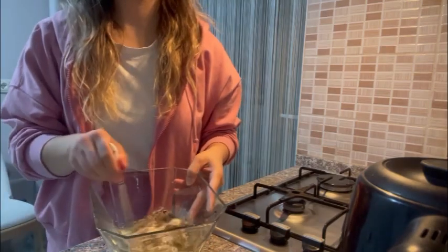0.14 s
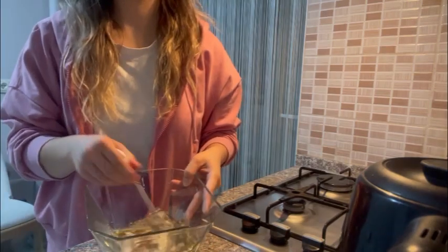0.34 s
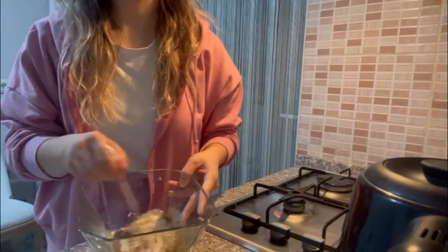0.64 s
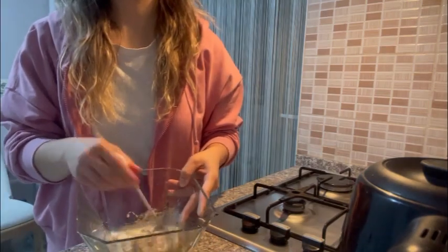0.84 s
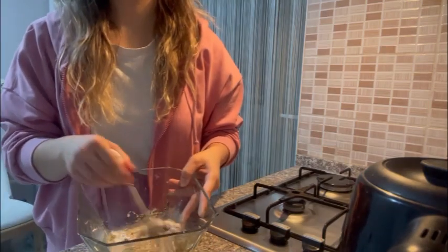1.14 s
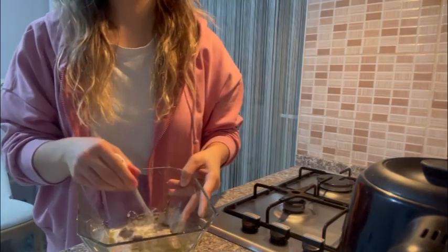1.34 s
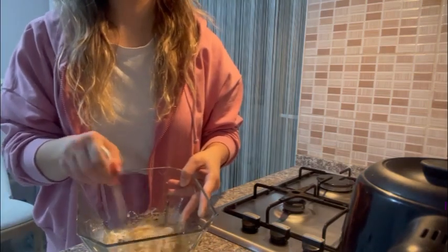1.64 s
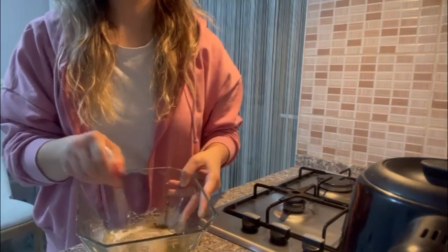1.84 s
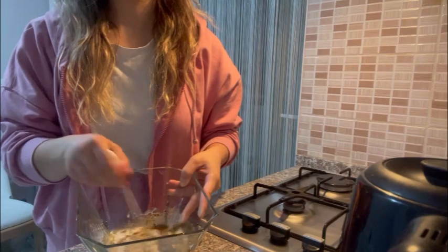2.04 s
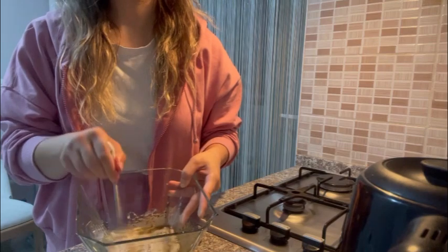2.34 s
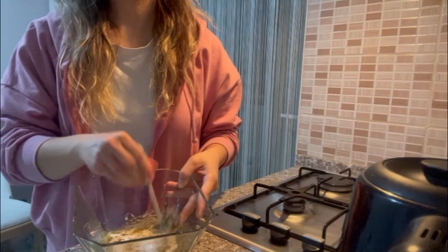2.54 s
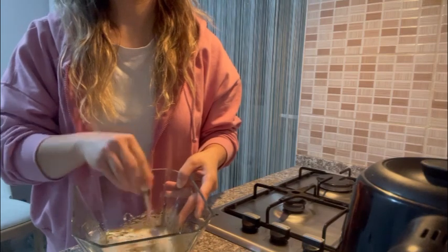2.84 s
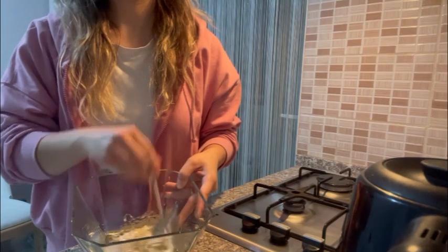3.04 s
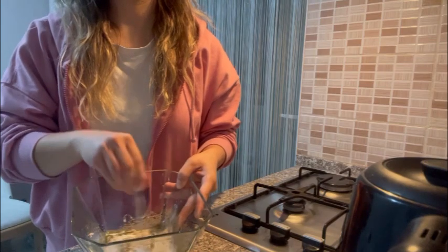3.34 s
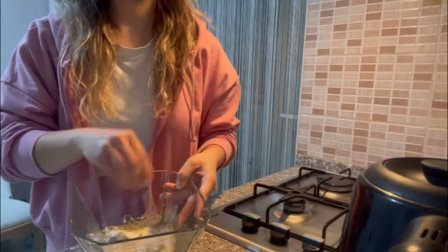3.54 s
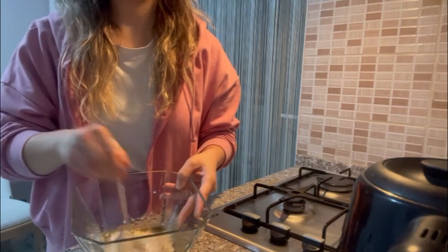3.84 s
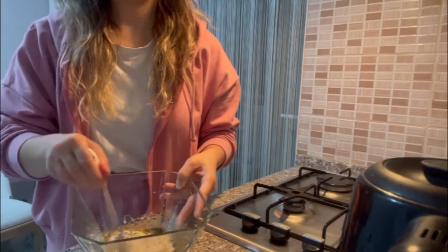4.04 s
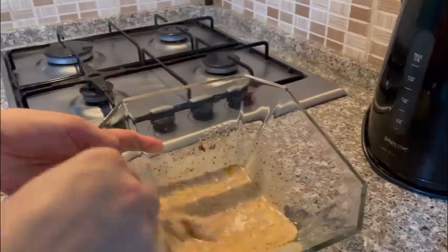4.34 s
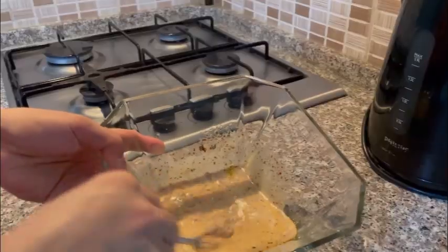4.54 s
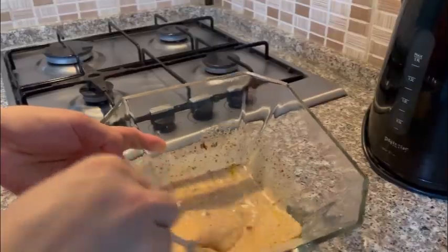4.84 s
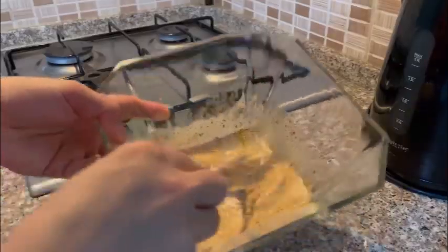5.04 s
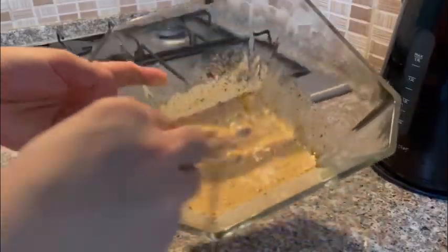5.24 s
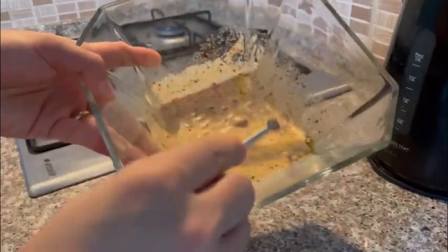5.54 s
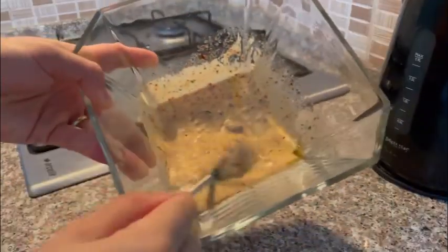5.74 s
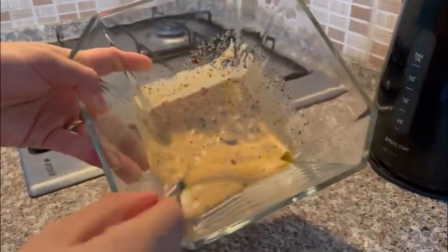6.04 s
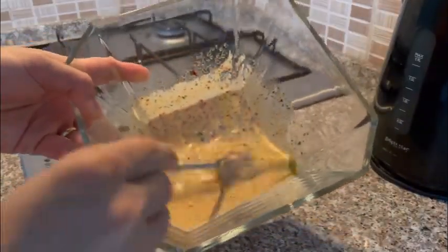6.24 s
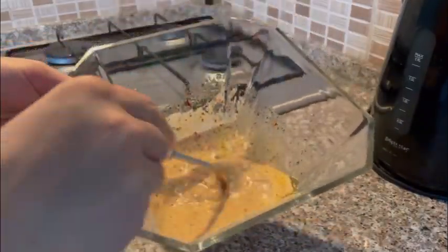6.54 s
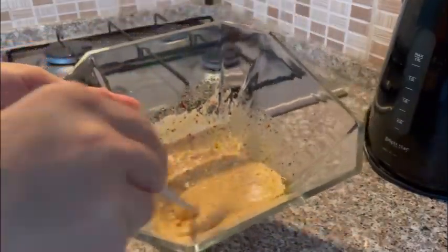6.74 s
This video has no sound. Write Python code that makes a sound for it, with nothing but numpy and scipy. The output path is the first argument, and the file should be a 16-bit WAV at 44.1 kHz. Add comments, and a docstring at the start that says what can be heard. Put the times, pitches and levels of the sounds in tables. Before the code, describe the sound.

A close stereo microphone in a small tiled kitchen hears a metal fork beating egg batter in a thick glass bowl on stone. A hard, hollow knock lands at 0.0 s, with the loudest at 0.85 and more strong ones at 1.0, 1.35 and 1.55, each rattling the fork. Between them come bright uneven clinks, scratchy scraping, wet crackle and small batter smacks around 0.4, 0.6 and 1.3. From 1.9 to 4.2 the knocks are mostly soft thumps, clinks stand out near 2.8 to 3.1, swishes gather around 3.5, and the pressed bowl groans briefly near 4.0 to 4.2. At 4.2 the ringing cuts off and the faint hum and air drop slightly. Stirring continues gentler and duller, with a thump at 4.5, clinks at 4.7 and 6.2, a quieter gap before 6.2, then soft wet scraping to about 7.

```python
"""Beating egg batter in a glass bowl

A metal fork beats batter in a square glass bowl on a stone counter in a small tiled kitchen. Knocks and clinks
are struck banks of modes with a noisy burst; groans are bowed tones. Scratching, skids and drone are random
slips through resonances; crackle, swishes, smacks, rumble and air are shaped noise. An appliance hums low, as
wavering sines. At 4.2 s the ringing is cut off and the background drops a little; afterwards the knocks are
thinner and brighter, the fork sounds duller and the stirring goes on more gently."""
import sys
import numpy as np
from scipy import signal
from scipy.io import wavfile
from scipy.ndimage import uniform_filter1d

SR = 44100
rng = np.random.default_rng(int(sys.argv[2]) if len(sys.argv) > 2 else 0)


def waveform_to_disk(signal):
    """Save audio, clipped to [-1, 1], as 16-bit WAV at the path in sys.argv[1]."""
    frames = np.transpose(np.atleast_2d(signal))
    scaled = np.clip(frames, -1, 1) * 32767
    samples = np.round(scaled).astype(np.int16)
    wavfile.write(sys.argv[1], SR, samples)


N = 303408
TIME = np.arange(N) / SR
BANDS = 1000 * 2 ** (np.arange(-15, 13) / 3)   # third-octave centres, Hz
BREAK_S = 4.226

# bowl against counter: (time [s], level [dB], strongest pitch [Hz], glassy edge [dB])
BOWL_KNOCKS = [(0.001, -11, 730, 0), (0.186, -32.5, 460, -12), (0.852, -5.5, 726, 2.5),
               (1.007, -18, 573, -0.5), (1.363, -10.5, 706, 2.5), (1.566, -8.5, 585, -2),
               (1.922, -32.5, 653, 14.5), (2.153, -37.5, 750, 10.5), (2.534, -35, 513, 2),
               (2.585, -33, 615, 11), (2.832, -22.5, 602, -16), (3.092, -26, 632, -1),
               (3.344, -36.5, 600, -17), (3.527, -45.5, 657, 4), (4.011, -31, 680, 9.5),
               (4.195, -36, 665, 8), (4.385, -54, 884, 11), (4.52, -26.5, 554.5, -7),
               (6.222, -54.5, 820, 8)]
# fork against glass: (time [s], level [dB], strongest pitch [Hz])
FORK_CLINKS = [(0.166, -35.5, 3960), (0.221, -38.5, 3960), (0.5104, -40, 4140), (0.555, -40, 4220),
               (0.618, -51, 12400), (0.7777, -55, 4200), (0.948, -38, 4200), (1.0192, -40.5, 4440),
               (1.151, -51.5, 4000), (1.275, -34.5, 3930), (1.5014, -43, 8300), (1.5566, -42.5, 12200),
               (1.737, -55, 8300), (1.872, -52, 4230), (1.9202, -34.5, 4735), (2.113, -40, 3950),
               (2.155, -47, 4650), (2.2702, -53.5, 12800), (2.503, -47, 3740), (2.5853, -35.5, 5800),
               (2.631, -48.5, 13800), (2.7538, -49, 7140), (2.774, -39.5, 3700), (2.833, -30, 2750),
               (2.9987, -29.5, 10880), (3.092, -31.5, 7400), (3.2677, -40, 4300), (3.3424, -39.5, 3960),
               (3.533, -49, 3930), (4.001, -45.5, 12000), (4.0092, -36, 4620), (4.191, -34, 10700),
               (4.253, -53, 6960), (4.384, -48, 4360), (4.47, -45, 4230), (4.7208, -33.5, 4000),
               (4.809, -58, 9730), (5.0054, -47.5, 4280), (5.741, -60, 9400), (6.2227, -35, 4190),
               (6.294, -39.5, 4175), (6.436, -59.5, 5500), (6.514, -58, 5970), (6.821, -60, 5880)]
# batter smacking off the fork: (time [s], level [dB], pitch [Hz])
BATTER_SMACKS = [(0.294, -53.5, 3600), (0.3701, -40.5, 2300), (0.6158, -44, 2700), (1.265, -41.5, 1740),
                 (1.951, -46, 2400), (4.013, -45, 2150), (4.1815, -47.5, 1730)]
# tines skidding on the glass: (middle time [s], level [dB], pitch [Hz])
TINE_SKIDS = [(1.198, -59.5, 5060), (1.85, -62.5, 4790), (2.091, -66.5, 4760), (3.463, -64, 4100),
              (4.452, -59, 4230), (4.993, -59.5, 3910), (6.31, -64.5, 4170), (6.6, -69, 4190)]
# fork sweeping batter along the wall: (middle time [s], level [dB], pitch [Hz])
WALL_SWISHES = [(0.439, -69, 2300), (0.76, -76, 4800), (1.11, -76, 5000), (1.85, -73, 5200),
                (2.08, -69.5, 4670), (2.32, -73.5, 4800), (2.43, -85, 4500), (2.715, -70, 3800),
                (2.96, -66, 3800), (3.221, -66, 5020), (3.473, -62, 3570), (3.555, -65, 3380),
                (3.69, -65, 3380), (3.771, -75.5, 4200), (5, -74, 4430), (5.12, -71, 4300),
                (6.31, -75, 5200), (6.57, -68.5, 5660), (6.689, -71.5, 2490), (6.86, -71, 4410)]
# bowl groaning under the pressed fork: (middle time [s], half length [s], level [dB], pitch [Hz])
BOWL_GROANS = [(1.307, 0.019, -48, 717), (2.185, .018, -44.5, 724), (4.035, .012, -32, 694),
               (4.074, .05, -47.5, 740), (4.161, 0.0342, -52, 742), (4.212, 0.012, -36, 679.3)]
# effort of the stirring, which sets the level of its scratching: (time [s], level [dB])
STIR_EFFORT = [(0.0, -71), (0.67, -73.5), (0.94, -75), (2.11, -81), (2.34, -79.5), (2.95, -73), (3.39, -79),
               (3.85, -86), (4.04, -100), (4.25, -72), (4.65, -79), (4.97, -73.5), (5.25, -79.5),
               (6.19, -100), (6.46, -75.5), (6.88, -78)]

# a hard knock as a faint lead-in, the main blow and two weaker repeats: (delay [s], level [dB])
HARD_KNOCK_PARTS = [(-0.007, -24), (0, -1.5), (0.008, -7.5), (0.022, -11.5)]
HARD_KNOCK_ABOVE_DB = -15
# a hard knock is bright and shakes the counter, a soft one is a dull, hollow thump:
# (knock level [dB], bass [dB], treble [dB])
KNOCK_COLOUR_BY_LEVEL = [(-47, 5, -11.5), (-20, -4, -17.5), (-17, -5.5, 6), (-5.5, 2, 8.5)]
# colour of the fork jolted by a knock: (frequency [Hz], level [dB])
FORK_JOLT_COLOUR = [(1500, -5), (1900, -1), (2800, -3), (4100, -20.5), (4560, -10.5), (6000, -16.5),
                    (11000, -33)]

# resonances of the bowl on the counter: (frequency [Hz], relative level [dB], t60 [s])
BOWL_RESONANCES = [(124, -3, 0.39), (180.6, -4.5, 0.43), (228.2, -7.5, 0.25), (263, 4, 0.11),
                   (314.6, -7.5, 0.33), (445, -6.5, 0.41), (495, 1.5, 0.095), (546, -5, 0.15),
                   (633, 4, 0.15), (664.4, 2.5, 0.25), (696.3, 3.5, 0.14), (736, -3, 0.2),
                   (804.4, -3.5, 0.28), (867, -13.5, 0.19), (915, -17.5, .25), (1203, -7.5, 0.27),
                   (1244, 2.5, 0.07), (1398.4, -24.5, 0.11), (1504, -9.5, 0.22), (1736, -21.5, 0.1),
                   (1872, -23, 0.14), (2353, -27, 0.16), (2670, -36.5, 0.27), (3040, -29.5, 0.2)]
# fork and glass wall ringing together: (frequency [Hz], relative level [dB], t60 [s])
FORK_RESONANCES = [(1530, 2.5, 0.46), (1888, 1.5, 0.23), (2414, -2, 0.1), (2690, -3.5, 0.0827),
                   (3830, 0.5, 0.12), (4177, 8, 0.13), (4550, 1.5, 0.19), (5930, -7, 0.2),
                   (7130, -2.5, 0.071), (7560, -5.5, 0.075), (7840, -4, 0.14), (8100, -0.5, 0.12),
                   (9730, -9.5, 0.12), (10240, -5, 0.1), (11230, -3, 0.14), (11900, -7, 0.065),
                   (12430, -14.5, 0.14), (13800, -10, 0.12)]
# dense, unresolved resonances of a knock: (frequency [Hz], density [dB per Hz])
KNOCK_THUD = [(30, -52), (50, -20.5), (75, -4.5), (120, -3), (280, -2.5), (380, -4), (620, 5), (800, -5.5),
              (1000, -13), (1350, -17), (1900, -28), (2500, -38), (3100, -45.5), (3900, -61.5), (6000, -66),
              (10000, -81.5)]
# dense, unresolved resonances of a clink: (frequency [Hz], density [dB per Hz])
CLINK_TICK = [(600, -24), (1200, 1.5), (2600, 2.5), (4200, -4), (5200, -6), (7500, 0), (10000, -5),
              (13000, -8), (16000, -22.5)]
# crackling and swishing batter: (frequency [Hz], density [dB per Hz])
WET_SPECTRUM = [(1000, -5.5), (2500, -1.5), (4500, 2.5), (6500, -8), (9000, -1), (12000, -11), (16000, -20)]
# rumble of the bowl: (frequency [Hz], density [dB per Hz])
RUMBLE_SPECTRUM = [(60, -26.5), (120, -8), (300, 4), (420, -5), (660, 4), (900, -9), (1200, -37),
                   (3000, -49.5), (7000, -79)]

# decay of the kitchen: (frequency [Hz], t60 [s])
KITCHEN_T60 = [(100, 1.16), (260, 0.78), (700, .5), (1800, 0.4627), (5000, 0.27), (14000, 0.23)]
# left-right likeness, from -1 opposite to 1 the same: (frequency [Hz], likeness [-])
STEREO_LIKENESS = [(60, 0.99), (110, .93), (200, 0.89), (380, 0.3), (700, -0.45), (1300, 0.088),
                   (2400, 0.27), (4400, 0.21), (8000, -0.74), (13000, 1)]
# still air of the kitchen: (frequency [Hz], density [dB per Hz])
AIR_SPECTRUM = [(15, -55), (25, -22.5), (102, -1), (134, -24.5), (166, -7.5), (217, -23.5), (301, -18),
                (451, -27.5), (624, -27), (1100, -39.5), (2280, -49), (2610, -56), (3200, -50),
                (4490, -52.5), (5880, -57.5), (16000, -77)]
# appliance hum: (frequency [Hz], relative level [dB])
APPLIANCE_HUM = [(97.5, -70), (296, -72.5)]
# faint high tones of the appliance: (frequency [Hz], relative level [dB])
APPLIANCE_WHINE = [(3085, -83.5), (3590, -87), (4545, -87)]

# after the break the knocks are thinner and brighter; pan is left minus right
LATE_BASS_DB, LATE_TREBLE_DB, LATE_PAN_DB = -5, 19, -0.5
# before the break the hollow low note of the bowl leans to the right (left minus right)
HOLLOW_PAN_DB = -3.5
# bowl and fork shudder on after each knock: level against the knock, and decay
SHUDDER_DB, SHUDDER_T60_S = -36, 0.86
# low ring of the clean wall, the batter's damping of it, and the top of each clink
CLEAN_RING_DB, COATING_DB_PER_S, CLINK_TOP_DB = 2, 3, 4.5
# after the break the batter chokes a clink's ring; its low note no longer sinks with time
LATE_CHOKE_DB_PER_S, LATE_RING_DB = 83.5, -10
# a knock jolts the fork: level, and growth in dB per dB of the knock
JOLT_DB, JOLT_GROWTH = -28.5, 1.205
# light touches between the clinks: rate at mean effort, and level above the effort
TOUCHES_PER_S, TOUCH_DB = 3.5, 3
# the batter fizzes as it runs back after each listed clink: level against the clink, and decay
FIZZ_DB, FIZZ_T60_S = -30.5, 0.25
# a skid at SKID_DB has length SKID_S; the length halves with every SKID_HALVING_DB more
SKID_S, SKID_DB, SKID_HALVING_DB = 0.022, -55.5, 6.5
# what the effort drives, in dB above it; after the break the bowl rumbles less
SCRAPE_DB, CRACKLE_DB, RUMBLE_DB, LATE_RUMBLE_DB = -1.5, -1.5, 14, -10
# low ring under the dragged fork, its damping by the coating, and the spurts of the scratching
SCRAPE_RING_DB, SCRAPE_COATING_DB_PER_S, SPURT_DB = 8.5, 0.1, 3
# after the break the fork sounds duller: a low-pass, a notch and a lift
DULL_LOWPASS_HZ, DULL_NOTCH_HZ, DULL_NOTCH_WIDTH_HZ = 10650, 8270, 1100
DULL_LIFT_HZ, DULL_LIFT_WIDTH_HZ, DULL_LIFT_DB = 6700, 820, 6   # level of the added resonance


def amp(db):
    """Decibels to amplitude."""
    return 10 ** (np.asarray(db) / 20)


def left_right(db):
    """Gains of the two sides for a level difference, left minus right."""
    return amp(db * np.array([[.5], [-.5]]))


def rms_one(x):
    """Scale to rms 1."""
    return x / np.sqrt(np.mean(x ** 2) + 1e-20)


def at_hz(points, hz):
    """Read a table on a log-frequency axis."""
    f, value = np.transpose(points)
    return np.interp(np.log(hz), np.log(f), value)


def band_gains(spectrum):
    """Third-octave gains of a spectrum, with total power 1."""
    gains = amp(at_hz(spectrum, BANDS)) * np.sqrt(BANDS)   # bandwidth grows with frequency
    return gains / np.linalg.norm(gains)


def drift(per_s):
    """Random wander between knots, spread near 1; it holds still if the 4000 knots run out."""
    knots = rng.standard_normal(4000)
    return np.interp(TIME * per_s, np.arange(len(knots)), knots)


def noise_bands():
    """Third-octave stereo noises (band, side, sample), each as alike left and right as the table says."""
    white = rng.standard_normal((2, 2, N), np.float32)
    bank = np.empty((len(BANDS), 2, N), np.float32)
    for k, hz in enumerate(BANDS):
        edges = [hz / 2 ** (1 / 6), hz * 2 ** (1 / 6)]
        sos = signal.butter(3, edges, "band", fs=SR, output="sos")
        mid, side = signal.sosfilt(sos, white[k % 2]).astype(np.float32)   # neighbours use separate noise
        alike = np.float32(np.clip(at_hz(STEREO_LIKENESS, hz), -1, 1))
        bank[k] = rms_one(np.sqrt(1 + alike) * mid + np.sqrt(1 - alike) * np.array([side, -side]))
    return bank


def coloured(bank, spectrum):
    """Steady stereo noise with a given spectrum and rms near 1."""
    noise = np.tensordot(band_gains(spectrum).astype(np.float32), bank, 1)
    return np.roll(noise, rng.integers(N), axis=1)


def resonate(x, hz, width_hz):
    """One two-pole resonance, gain 1 on top."""
    r = np.exp(-np.pi * width_hz / SR)
    zeros = np.array([1, 0, -1]) * (1 - r * r) / 2
    poles = [1, -2 * r * np.cos(2 * np.pi * hz / SR), r * r]
    return signal.lfilter(zeros, poles, x + 1e-18)


def grains(per_s, spread_db):
    """Random tiny slips of uneven size, reaching each side with its own strength."""
    slipping = rng.random(N) < per_s / SR
    sizes = amp(spread_db * np.minimum(rng.exponential(1, N), 4))
    return rms_one(slipping * sizes * rng.standard_normal((2, N)))


def add(out, s, sound):
    """Place a sound at s; one that starts before the break is cut off there."""
    start = max(round(s * SR), 0)
    stop = min(start + sound.shape[1], round(BREAK_S * SR) if s < BREAK_S else N)
    out[:, start:stop] += sound[:, :stop - start]


def aftermath(blows, level_db, t60):
    """Strength of the dying motion that each blow leaves behind, up to a second long."""
    out, fade = np.zeros((1, N)), amp(-60 * TIME[:SR] / t60)[None]
    for s, db, *_ in blows:
        add(out, s, amp(db + level_db) * fade)
    return out[0]


def body(bank, modes, dense, dense_db, dense_t60, room_db, rise_s, rise_cycles, uneven_db,
         favour_db, favour_octaves, blur_hz, rebound, size):
    """A struck thing: clear modes, a fast burst of dense ones, and the room's tail. Returns its strike."""
    t = np.arange(size) / SR
    hz, mode_db, t60 = np.transpose(modes)
    upper = hz > 2100

    def swell(f):
        """Low resonances take longer to build up."""
        return 1 - np.exp(-t / (rise_s + rise_cycles / f[:, None]))

    rings = swell(hz) * amp(-60 * t / t60[:, None]) * np.exp(2j * np.pi * hz[:, None] * t)
    heights = amp(mode_db) / np.linalg.norm(amp(mode_db))
    # phase of each mode at the two sides
    apart = np.arccos(np.clip(at_hz(STEREO_LIKENESS, hz), -1, 1)) * np.array([[.5], [-.5]])
    burst = amp(-60 * t / dense_t60)
    tail = amp(-60 * t / at_hz(KITCHEN_T60, BANDS)[:, None])
    fade = (swell(BANDS) * np.hypot(burst, amp(room_db) * tail)).astype(np.float32)

    def strike(colour, pitch_hz):
        """One blow, coloured by its contact, whose place favours the modes near one pitch; rms 1 at first."""
        favour = favour_db * np.exp(-(np.log2(hz / pitch_hz) / favour_octaves) ** 2)
        uneven = uneven_db * rng.standard_normal(len(hz))
        shares = heights * amp(at_hz(colour, hz) + favour + uneven)
        # the contact keeps sliding, so the upper modes waver and their lines widen
        wander = np.cumsum(rng.standard_normal(size)) * np.sqrt(2 * np.pi * blur_hz / SR)
        waver = uniform_filter1d(np.exp(1j * wander), size=60)
        starts = shares * np.exp(1j * (apart + 2 * np.pi * rng.random(len(hz))))
        clear = ((starts * ~upper) @ rings + waver * ((starts * upper) @ rings)).real
        at = rng.integers(N - size)
        gains = (band_gains(dense) * amp(dense_db + at_hz(colour, BANDS))).astype(np.float32)
        crack = np.einsum("bt,bct->ct", gains[:, None] * fade, bank[:, :, at:at + size])
        # the contact rebounds within two milliseconds, at lags that differ from blow to blow
        for lag in rng.integers(18, 80, 2):
            later = np.pad(crack, ((0, 0), (lag, 0)))[:, :size]
            crack = (crack + rebound * later) / np.hypot(1, rebound)
        sound = clear + crack
        return sound / np.sqrt(np.mean(sound[:, :SR // 40] ** 2))   # over the first 25 ms
    return strike


def knocks(bank):
    """The bowl drops back on the counter: hard blows reach the upper glass modes, soft shoves only thump."""
    strike = body(bank, BOWL_RESONANCES, KNOCK_THUD, dense_db=-1.0, dense_t60=0.081, room_db=-13.5,
                  rise_s=0.0038, rise_cycles=0.36, uneven_db=4.0, favour_db=9.5, favour_octaves=0.12,
                  blur_hz=35, rebound=0, size=27000)
    out = np.zeros((2, N))
    strengths, basses, trebles = np.transpose(KNOCK_COLOUR_BY_LEVEL)
    for s, db, pitch_hz, edge_db in BOWL_KNOCKS:
        late = s > BREAK_S
        bass_db = np.interp(db, strengths, basses) + late * LATE_BASS_DB
        plain_treble_db = np.interp(db, strengths, trebles)
        treble_db = plain_treble_db + late * LATE_TREBLE_DB
        # after the break the middle treble is brighter but not the glassy edge
        colour = [(280, bass_db), (480, 0.0013), (780, 0.00083), (960, treble_db), (1550, treble_db),
                  (1850, plain_treble_db + edge_db)]
        pan = left_right(LATE_PAN_DB if late else 0)
        parts = HARD_KNOCK_PARTS if db > HARD_KNOCK_ABOVE_DB else [(0, 0.0091)]
        for delay_s, part_db in parts:
            add(out, s + delay_s, pan * amp(db + part_db - 5.5) * strike(colour, pitch_hz))
    return out


def groans(waver_hz=32, rough_db=8.5, apart=1.62):
    """The pressed fork bows the bowl's hollow note: a wavering, rough tone, apart in phase (rad) at the sides."""
    out, bend, rough = np.zeros((2, N)), waver_hz * drift(110), amp(rough_db * drift(120))
    for s, length, db, hz in BOWL_GROANS:
        near = np.abs(TIME - s) < 2 * length
        phase = 2 * np.pi * np.cumsum(hz + bend[near]) / SR + apart * np.array([[.5], [-.5]])
        swell = np.exp(-((TIME[near] - s) / length) ** 2)
        add(out, s - 2 * length, amp(db) * swell * rms_one(rough[near] * np.sin(phase)))
    return out


def clinks(bank, effort_db):
    """The fork hits the wall: a sharp tick and a short ring, damped by the batter. Every knock jolts it too."""
    strike = body(bank, FORK_RESONANCES, CLINK_TICK, dense_db=10.5, dense_t60=0.022, room_db=-18.0,
                  rise_s=0.00018, rise_cycles=0.64, uneven_db=7, favour_db=14.5, favour_octaves=0.055,
                  blur_hz=25, rebound=0.88, size=11000)
    out = np.zeros((2, N))

    def clink(s, db, pitch_hz):
        """One contact, with its low ring damped by the coating."""
        late = s > BREAK_S
        ring_db = LATE_RING_DB if late else CLEAN_RING_DB - COATING_DB_PER_S * s
        colour = [(2000, ring_db), (3000, 0), (7500, 0.00073), (11000, CLINK_TOP_DB)]
        sound = strike(colour, pitch_hz)
        choke_db = late * LATE_CHOKE_DB_PER_S * TIME[:sound.shape[1]]
        add(out, s, amp(db - 14.0 - choke_db) * sound)

    for s, db, pitch_hz in FORK_CLINKS:
        clink(s, db, pitch_hz)
    for s, db, _, edge_db in BOWL_KNOCKS:
        jolt_db = JOLT_DB + JOLT_GROWTH * db + edge_db
        add(out, s, amp(jolt_db) * strike(FORK_JOLT_COLOUR, pitch_hz=1890))
    # light touches come more often when the effort is high
    touches_per_s = TOUCHES_PER_S * amp(effort_db - effort_db.mean())
    for at in np.flatnonzero(rng.random(N) < touches_per_s / SR):
        clink(at / SR, effort_db[at] + TOUCH_DB, pitch_hz=4200)
    return out


def stirring(bank, effort_db):
    """The dragged fork keeps its modes and the bowl sounding, while the batter crackles."""
    trembling = aftermath(BOWL_KNOCKS, SHUDDER_DB, SHUDDER_T60_S)
    fizz = aftermath(FORK_CLINKS, FIZZ_DB, FIZZ_T60_S)
    scratch_db = effort_db + SPURT_DB * drift(16)
    rumble_level = np.hypot(amp(effort_db + RUMBLE_DB + LATE_RUMBLE_DB * (TIME > BREAK_S)), trembling)
    scrape_level = np.hypot(amp(scratch_db + SCRAPE_DB), amp(-13.5) * trembling)
    wet_level = np.hypot(amp(scratch_db + CRACKLE_DB), fizz)
    slips = grains(per_s=4500, spread_db=4.0) * amp(4.3 * drift(27))
    # the contact damps the modes, and the moving tines wake now one, now another
    low_ring = amp(SCRAPE_RING_DB - SCRAPE_COATING_DB_PER_S * TIME)
    rings = np.zeros((2, N))
    for hz, db, t60 in FORK_RESONANCES:
        waking = amp(db + 3.5 * drift(26)) * (low_ring if hz < 2000 else 1) / (1 + (hz / 6000) ** 2)
        rings += waking * resonate(slips, hz, 4 / t60 + 0.01 * hz)
    # each band of the wet noise swells and fades at random, by itself
    wet_noise = np.zeros((2, N))
    for hz, gain, band in zip(BANDS, band_gains(WET_SPECTRUM), bank):
        if hz > 1800:
            wet_noise += gain * amp(6.8 * drift(73)) * band
    # pushing the fork makes the bowl drone at its hollow note
    drone = rms_one(resonate(resonate(slips, hz=640, width_hz=80), hz=660, width_hz=340))
    crackle = rms_one(amp(2 * drift(30) + 1.0 * drift(650)))
    rumble = amp(1.1 * drift(10)) * coloured(bank, RUMBLE_SPECTRUM)
    return (scrape_level * rms_one(rings) + wet_level * crackle * rms_one(wet_noise)
            + rumble_level * (amp(-6.0) * drone + rumble))


def skids(width_hz=150, skirt_hz=1100, rasp_hz=2800, rasp_width_hz=900, rasp_db=-16, stutter_db=1.5):
    """Tines stick and slip over the glass: a stuttering chirr and a broad rasp; louder skids are shorter."""
    out = np.zeros((2, N))
    slips = grains(per_s=1300, spread_db=5) * amp(stutter_db * drift(130))
    for s, db, hz in TINE_SKIDS:
        length = SKID_S * 2 ** ((SKID_DB - db) / SKID_HALVING_DB)
        near = np.abs(TIME - s) < 2 * length
        swell = np.exp(-2 * ((TIME[near] - s) / length) ** 2)
        chirr = resonate(resonate(slips[:, near], hz, width_hz), hz, skirt_hz)
        rasp = resonate(resonate(slips[:, near], rasp_hz, rasp_width_hz), rasp_hz, 2 * rasp_width_hz)
        out[:, near] += amp(db) * swell * (rms_one(chirr) + amp(rasp_db) * rms_one(rasp))
    return out


def swishes(bank, length_s=0.023, glide_octaves_per_s=2.5, hump_db=7, hump_octaves=0.38, grit_db=2.5,
            ring_db=2, patchy_db=9.0):
    """Each sweep drags batter along the wall: a gritty swell, its broad pitch gliding up, with singing tines."""
    out, grit = np.zeros((2, N)), amp(grit_db * (drift(530) + .5 * drift(120)))
    # each band of the noise swells and fades at random, by itself
    knots = rng.standard_normal((len(BANDS), SR // 300))
    patches = np.array([np.interp(TIME[:SR] * 90, np.arange(len(row)), row) for row in knots])
    wet = (band_gains(WET_SPECTRUM) * (BANDS > 1400))[:, None]
    for s, db, hz in WALL_SWISHES:
        near = np.flatnonzero(np.abs(TIME - s) < 2 * length_s)
        t = TIME[near] - s
        octaves = np.log2(BANDS / hz)[:, None] - glide_octaves_per_s * t
        hump = hump_db * np.exp(-(octaves / hump_octaves) ** 2)
        gains = wet * amp(hump + patchy_db * patches[:, near % SR])
        rub = grit[near] * np.einsum("bt,bct->ct", gains, bank[:, :, near])
        rub = rub + amp(ring_db) * resonate(rub, hz=4260, width_hz=60)
        out[:, near] += amp(db) * np.exp(-(t / length_s) ** 2) * rms_one(rub)
    return out


def smacks(width_hz=900, t60=0.054, room_db=-17, room_t60=0.44):
    """Air pockets in the batter snap open: noise with a broad pitch, a fast decay and a faint room tail."""
    out, t = np.zeros((2, N)), TIME[:SR // 3]
    fade = np.hypot(amp(-60 * t / t60), amp(room_db - 60 * t / room_t60))
    highpass = signal.butter(2, 1400, "high", fs=SR, output="sos")
    for s, db, hz in BATTER_SMACKS:
        snap = resonate(rng.standard_normal((2, len(t))), hz, width_hz)
        add(out, s, amp(db) * fade * rms_one(signal.sosfilt(highpass, snap)))
    return out


def kitchen(bank, whine_width_hz=70, air_db=-58):
    """Still air and a wavering appliance hum with a faint whine, a little louder before the break."""
    hum, whine = np.zeros(N), np.zeros((2, N))
    for hz, db in APPLIANCE_HUM:
        level = amp(db + 2.5 * drift(41.0)) * np.sqrt(2)   # a sine of rms 1 peaks at root two
        hum += level * np.sin(2 * np.pi * hz * TIME + 0.5 * drift(25.37))
    for hz, db in APPLIANCE_WHINE:
        whine += amp(db) * rms_one(resonate(rng.standard_normal((2, N)), hz, whine_width_hz))
    air = amp(air_db) * coloured(bank, AIR_SPECTRUM)
    return (hum + whine + air) * amp(np.where(TIME < BREAK_S, 3, -.5))


def duller_after_break(x):
    """After the break the fork sounds duller: a low-pass, a notch and a lift."""
    dull = signal.sosfilt(signal.butter(4, DULL_LOWPASS_HZ, fs=SR, output="sos"), x)
    dull = dull + amp(DULL_LIFT_DB) * resonate(dull, DULL_LIFT_HZ, DULL_LIFT_WIDTH_HZ)
    for _ in range(2):
        dull = dull - resonate(dull, DULL_NOTCH_HZ, DULL_NOTCH_WIDTH_HZ)
    return np.where(TIME < BREAK_S, x, dull)


def scene():
    """One effort drives the stirring; knocks, groans, clinks, smacks, skids and swishes stand out of it."""
    bank = noise_bands()
    effort_db = np.interp(TIME, *np.transpose(STIR_EFFORT))
    background = kitchen(bank)
    bowl = knocks(bank) + groans()
    hollow = (TIME < BREAK_S) * resonate(bowl, hz=480, width_hz=420)
    bowl = bowl + (left_right(HOLLOW_PAN_DB) - 1) * hollow
    batter = smacks()
    fork = skids() + swishes(bank) + stirring(bank, effort_db) + clinks(bank, effort_db)
    return background + bowl + batter + duller_after_break(fork)


def record(dry):
    """The deepest bass is rolled off and the top is cut steeply."""
    lean = signal.sosfilt(signal.butter(2, 38, "high", fs=SR, output="sos"), dry)
    return signal.sosfilt(signal.ellip(10, .2, 80, 16200, fs=SR, output="sos"), lean)


dry = scene()
out = record(dry)
waveform_to_disk(out)
```